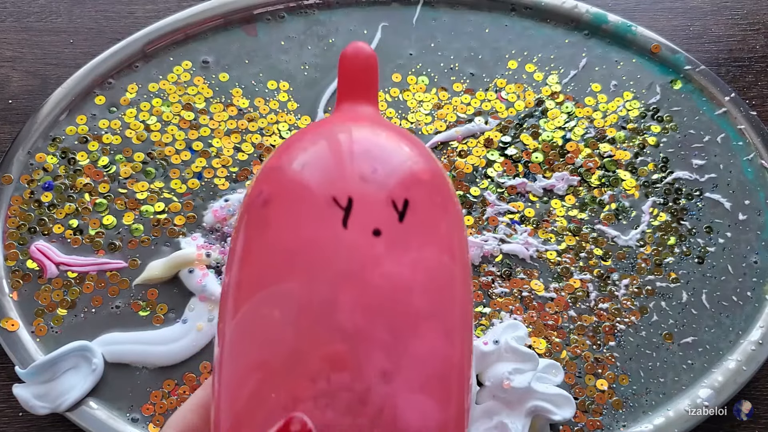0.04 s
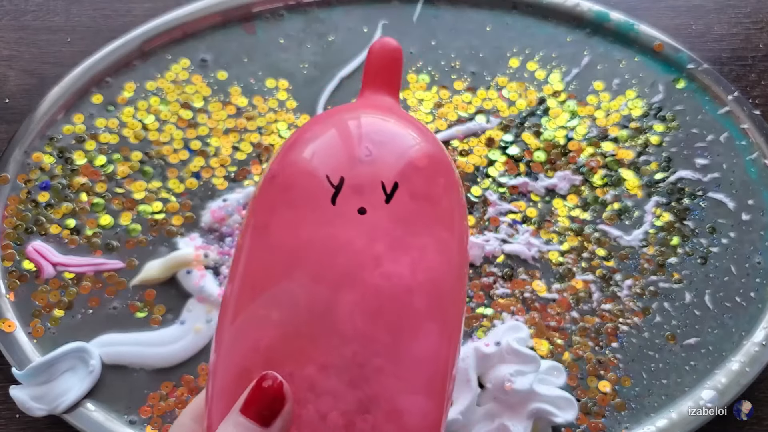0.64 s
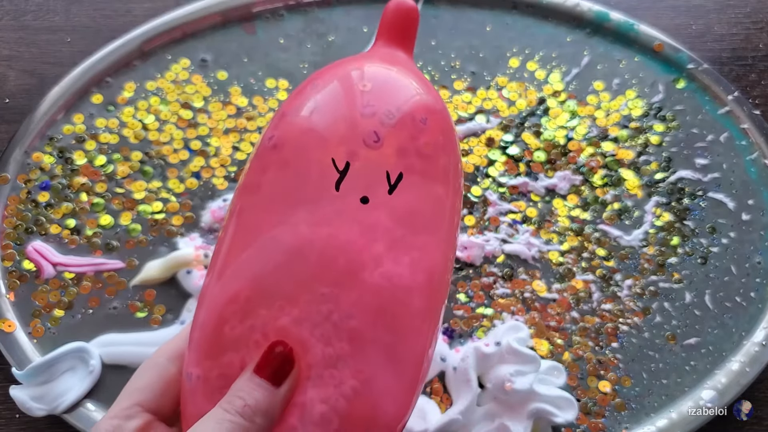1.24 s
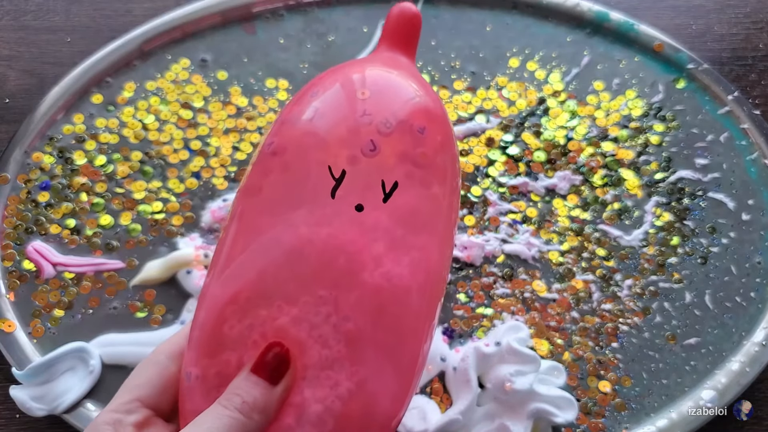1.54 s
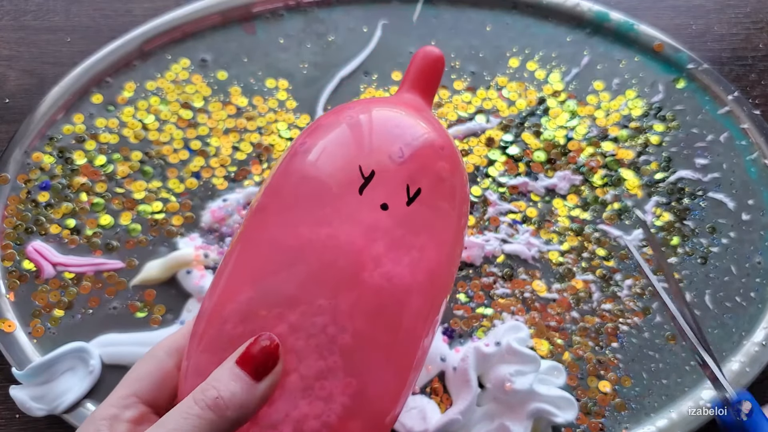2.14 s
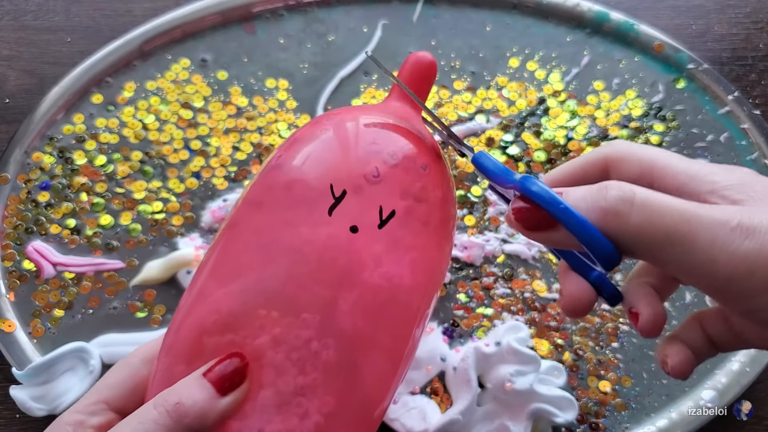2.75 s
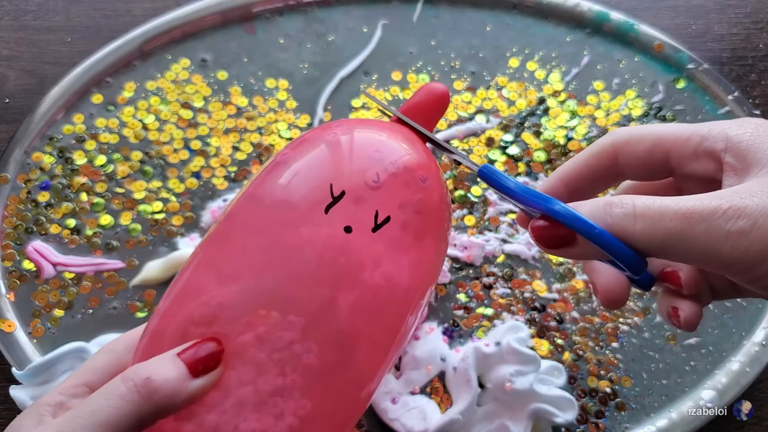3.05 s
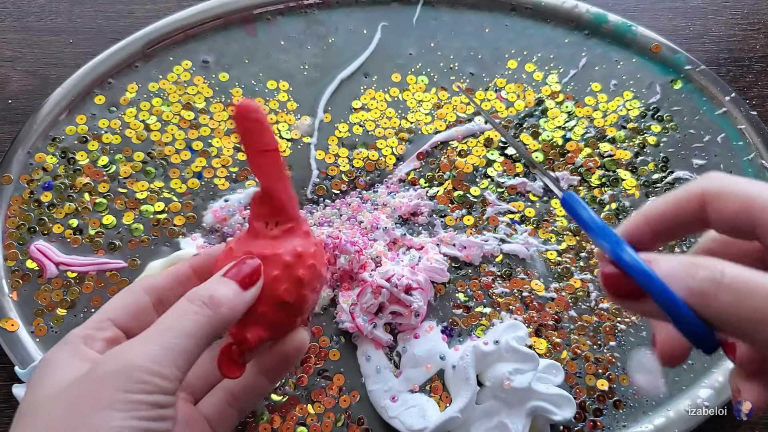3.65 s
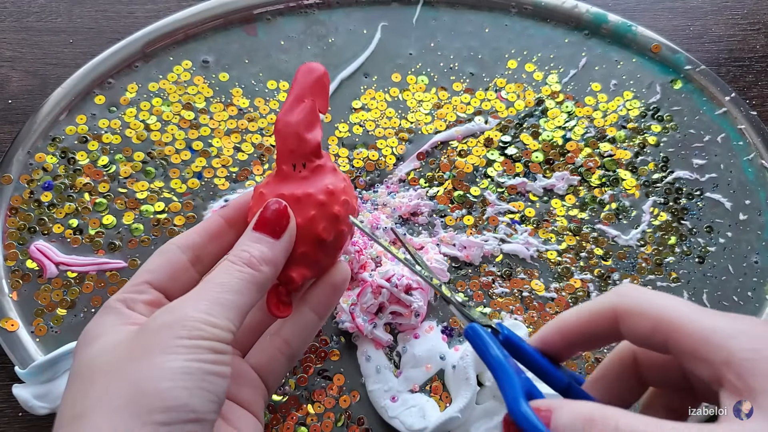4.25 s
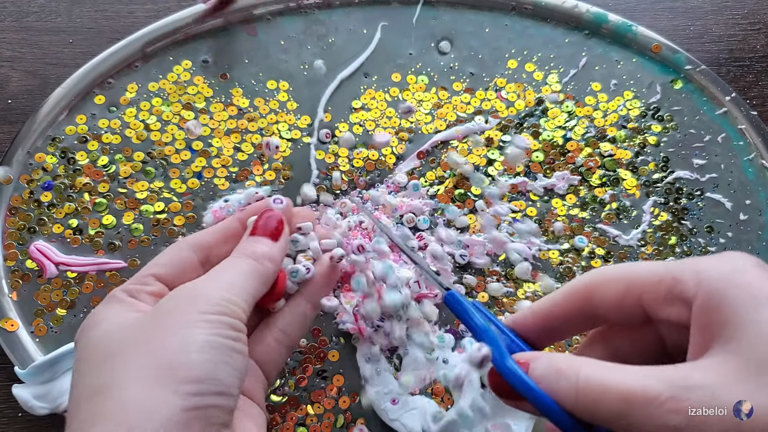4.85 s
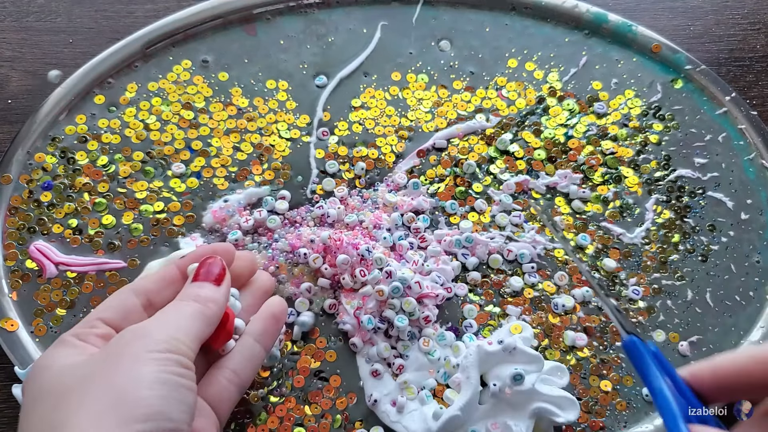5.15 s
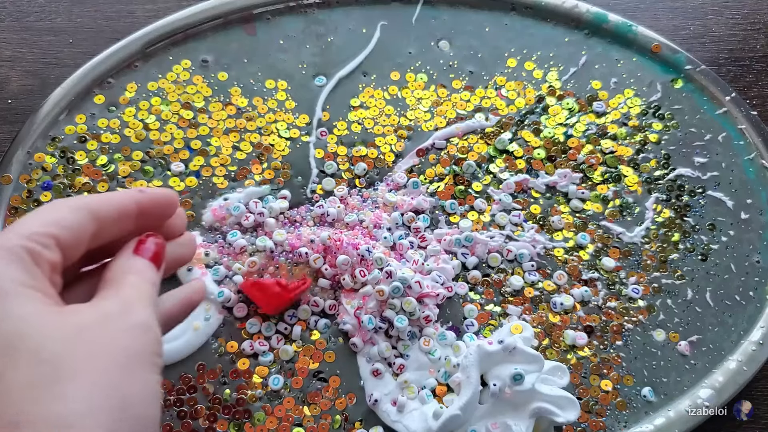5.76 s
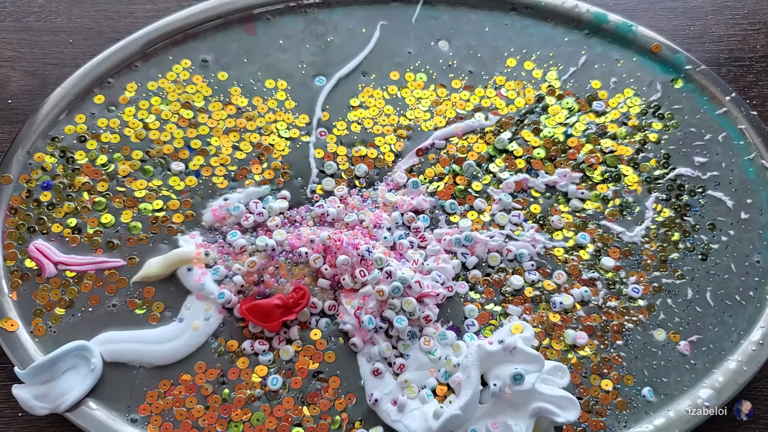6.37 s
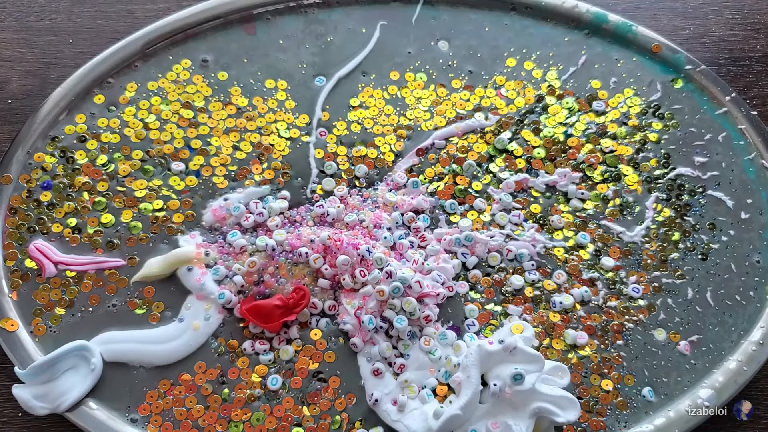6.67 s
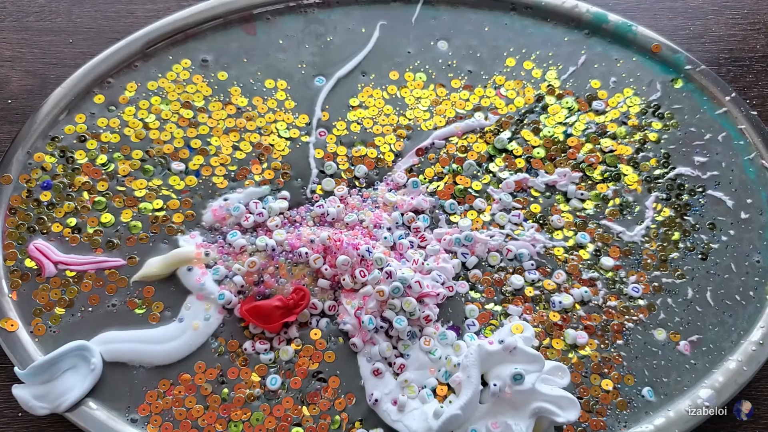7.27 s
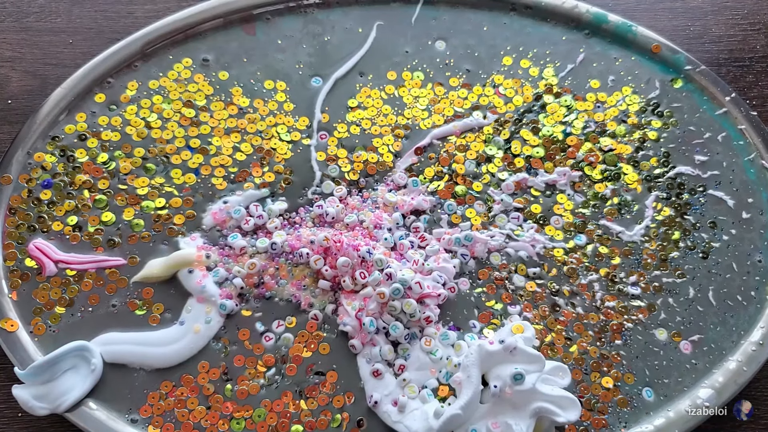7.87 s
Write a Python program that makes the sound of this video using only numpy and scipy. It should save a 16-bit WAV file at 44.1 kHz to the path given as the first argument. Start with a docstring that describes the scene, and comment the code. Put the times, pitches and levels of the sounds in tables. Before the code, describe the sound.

Beads slosh in a rubbed balloon that deflates with a squeak and a burst, followed by clicking beads and soft crunching strokes.

```python
"""Snipping a balloon full of beads

A thin balloon bag of beads is shaken and handled close to a microphone: its skin rustles, groans
and snaps. Once snipped, it squeaks and blows its air out. Beads click onto a tray, and a soft grainy
mass is crunched in strokes until the sound stops short. The loudest hits overload the microphone."""
import sys
import numpy as np
from scipy import signal
from scipy.fft import rfft, irfft, next_fast_len
from scipy.io import wavfile
from scipy.ndimage import uniform_filter1d

SR = 44100
rng = np.random.default_rng(int(sys.argv[2]) if len(sys.argv) > 2 else 0)


def digitize_waveform(pressure):
    """Quantize a signal to 16-bit integers and store it at the path in sys.argv[1].

    Rows of a 2-D input are taken as channels; values are limited to [-1, 1].
    """
    field = np.atleast_2d(pressure).T
    bounded = np.clip(field, -1, 1)
    quanta = np.round(bounded * 32767).astype(np.int16)
    wavfile.write(sys.argv[1], SR, quanta)


N = 357651
TIME = np.arange(N) / SR

# how long the room echoes; a fade (t60) is the time to fall by 60 dB: (frequency [Hz], fade [s])
ROOM_FADES = [(200, 0.42), (3000, 0.26), (15000, 0.073)]
# tone of the background rumble: (frequency [Hz], level [dB])
RUMBLE_TONE = [(20, -31), (45, 1), (80, -5), (140, -12), (250, -19.5), (700, -27.5), (2000, -34),
               (4800, -31.5), (7000, -37.5), (16000, -41)]
# something drags and groans; the last row is a bright swell near 2 kHz within the crunching: (time [s], length
# [s], level [dB], pitch [Hz])
DRAGS = [(.46, 0.26, -34.5, 421), (0.871, 0.08, -49, 1364), (.993, 0.066, -37.5, 1380),
         (.999, .33, -42, 195), (1.145, 0.053, -37, 1760), (1.401, 0.28, -41.5, 175),
         (1.469, .065, -43, 385), (1.59, .21, -42, 1000), (2.464, .25, -52.5, 423), (2.765, 0.18, -47, 415),
         (2.776, 0.29, -51.5, 1300), (3.127, 0.16, -51, 400), (3.253, .15, -37, 2520),
         (7.043, 0.19, -24, 2180)]
# fingers shift their grip on the skin: (time [s], level [dB])
GRIPS = [(.02, -50), (.47, -32), (.66, -51), (1.01, -36), (1.155, -43), (1.22, -38), (1.49, -47),
         (1.61, -48), (1.74, -43), (2.02, -44), (2.81, -42.5), (3.18, -57), (3.3, -43)]
# tone of the rubbed skin: (frequency [Hz], level [dB])
SKIN_TONE = [(150, -9.5), (400, -2.5), (750, -9), (1350, 1.5), (2000, -10), (2700, -1), (3800, -12.5),
             (5000, -15.5), (8000, -27), (16000, -30)]
# clumps of beads bump the wall of the bag: (time [s], level [dB])
BUMPS = [(.408, -36), (0.456, -30), (.475, -21), (.545, -14.5), (.5575, -10.5), (0.567, -10), (0.612, -18),
         (.639, -19), (.678, -23), (0.775, -36.5), (1.586, -30.5), (1.735, -31.5)]
# tone of the sloshing beads: (frequency [Hz], level [dB])
SLOSH_TONE = [(100, -26.5), (230, -13.5), (430, -6.5), (730, -12), (1400, -1.5), (1800, -13), (2400, -3.5),
              (2900, -12), (4100, -17), (6000, -21), (16000, -37.5)]
# single beads tap the tight bag: (time [s], level [dB])
TAPS = [(0.585, 1), (1.845, -32.5), (2.03, -42), (2.068, -29), (2.159, -36), (2.184, -37), (2.278, -43.5),
        (2.413, -47), (3.023, -40), (4.8944, 3.5)]
# the shrinking bag jerks its beads together: (time [s], level [dB], fade [s])
JERKS = [(3.309, -28.5, 0.1), (3.461, -27, 0.1), (3.505, -14, 0.053), (3.555, -15, 0.32),
         (3.578, -0.5, 0.084), (3.596, -7, 0.085), (3.614, -5, 0.051), (3.686, -3.5, 0.044),
         (3.714, -19, 0.3), (3.759, -7.5, 0.12), (3.799, -8, 0.068)]
# tone of the space inside the shrinking bag: (frequency [Hz], level [dB])
CAVITY_TONE = [(200, -11.5), (1000, -7), (2000, -15), (2750, 7), (3600, -7.5), (5100, -4.5), (5700, -18.5),
               (6400, -6), (7800, -17.5), (16000, -24.5)]
# sharp snaps of the tight skin: (time [s], level [dB])
SNAPS = [(1.033, -18.5), (1.2356, -12.5), (1.517, -17)]
# the notes a snap rings at: (pitch [Hz], level [dB], fade [s])
SNAP_NOTES = [(1420, -4.5, 0.25), (3620, -1, 0.28), (4360, -1, 0.15), (6470, -3.5, 0.44),
              (9170, -4.5, 0.29), (12900, -3, 0.31)]
# the slit squeaks in spurts: (time [s], hold [s], level [dB])
SPURTS = [(3.312, .008, -27), (3.353, .025, -24.5), (3.383, .008, -16)]
# air hisses through the slit, then bursts out: (time [s], hold [s], level [dB])
GUSTS = [(3.327, .46, -38), (3.52, .033, -10.5)]
# tone of the rushing air: (frequency [Hz], level [dB])
AIR_TONE = [(150, -11), (900, -0.5), (1900, -6), (2700, 0.5), (6500, -6), (7800, -6), (12000, -8),
            (16000, -11)]
# where the rushing air half whistles: (pitch [Hz])
WHISTLE_PITCHES = [2600, 6560, 8850, 11200, 13800]
# puffs of air hit the microphone: (time [s], level [dB], fade [s])
PUFFS = [(3.515, -18.5, 0.56), (3.786, -15, .16), (7.26, -32, .35)]
# heavy beads knock the tray: (time [s], level [dB])
KNOCKS = [(3.512, -5.5), (3.801, -8), (3.881, -17), (4.8934, -7.5), (5.073, -9), (5.213, -11.5)]
# deep presses on the mass: (time [s], hollow level [dB], thud level [dB], fade [s])
PRESSES = [(3.539, -29, -26, 0.9), (5.05, -42, -27, 0.53), (5.741, -8, -34, 0.16), (5.82, -24, -40, 0.65),
           (6.002, -18.5, -38, 0.082), (6.226, -21, -41, 0.34), (6.41, -16.5, -25, 0.5),
           (6.731, -17, -29.5, 0.32), (6.763, -29, -18, 0.26), (7.222, -37, -33, 0.37)]
# strokes push the mass along: (time [s], length [s], level [dB], fizz level [dB])
STROKES = [(3.594, 0.18, -20.5, -36), (4.037, 0.19, -34, -53), (4.668, .05, -31, -39),
           (5.038, 0.53, -24.5, -35.5), (5.617, 0.5, -25.5, -41), (6.24, 0.089, -27, -51),
           (6.563, 0.092, -27, -46), (6.883, 0.075, -24, -38), (7.002, 0.51, -20.5, -31),
           (7.554, .2, -30.5, -58), (7.872, 0.034, -29, -43)]
# tone of the shifting grains: (frequency [Hz], level [dB])
GRAIN_TONE = [(60, -20.5), (210, 0), (300, -4.5), (550, -3), (900, -2), (1400, 1), (1900, -1), (2900, 4.5),
              (4200, -1), (6500, -5), (9000, -18.5), (14000, -46)]
# tone of their bright fizz and pops: (frequency [Hz], level [dB])
FIZZ_TONE = [(4500, -3), (8000, 7), (12000, 3), (16000, -2.5)]
# pushes set many grains off at once: (time [s], level [dB], fade [s])
CRUNCHES = [(4.504, -22.5, 0.45), (4.843, -18.5, 0.67), (4.897, -19, 0.061), (5.069, -10.5, 0.1),
            (5.084, -13, 0.17), (5.451, -10, 0.033), (5.617, -13, 0.47), (5.738, -9, 0.33),
            (5.837, -16.5, 0.43), (5.883, -14.5, 0.73), (6.002, -14.5, 0.27), (6.145, -19.5, 1),
            (6.226, -14.5, 0.41), (6.491, -14.5, 0.28), (6.517, -16.5, 1), (6.601, -12, 0.21),
            (6.978, -14.5, 0.33), (7.03, -18, 0.39), (7.1, -20.5, 0.71), (7.557, -19.5, 0.68),
            (7.679, -21.5, 0.8)]
# tone of a crunch: (frequency [Hz], level [dB])
CRUNCH_TONE = [(120, -47), (200, -32.5), (299, -17), (500, -10.5), (623, -7), (722, -16), (821, -9.5),
               (1120, -14.5), (2130, -12.5), (3100, -4.5), (4000, -7.5), (5400, -13.5), (10100, -22),
               (16000, -34.5)]
# beads strike the tray: (time [s], level [dB], tick level [dB])
CLICKS = [(3.758, -16, -26), (3.843, -3, -15.5), (3.878, -10, -12), (3.88, 3, -30), (3.976, 0, -14.5),
          (4.028, 2, -13.5), (4.148, -5, -20.5), (4.176, -3.5, -19.5), (4.237, -14.5, -31),
          (4.332, -4.5, -25), (4.376, 0, -16.5), (4.482, -5.5, -25), (4.608, -5, -41), (4.655, 2, -17),
          (4.695, -10, -31), (4.773, -10, -30), (4.843, -14, -28), (4.894, 1.5, -4.5), (5.01, -5, -15.5),
          (5.087, 5, -16), (5.095, -1.5, -14), (5.137, -6, -20), (5.144, -3, -15), (5.213, 1.5, -16),
          (5.282, -10, -24), (5.315, -3.5, -15.5), (5.344, -5, -21), (5.45, 0, -17), (5.461, -3, -25),
          (5.482, -6.5, -19), (5.537, -9.5, -25), (5.599, -5, -27), (6.784, 1.5, -17.5), (6.879, -4, -22)]


def amp(db):
    """Turns decibels into a number to multiply by."""
    return 10 ** (np.asarray(db) / 20)


def evened(x):
    """Scales a sound to an average strength (rms) of 1."""
    return x / np.sqrt(np.mean(x ** 2) + 1e-20)


def read(points, hz):
    """Reads between the rows of a table, giving every octave equal space."""
    f, value = np.transpose(points)
    return np.interp(np.log(hz + 1), np.log(f + 1), value)


def add(mix, s, sound):
    """Mixes a sound in at s seconds."""
    part = mix[round(s * SR):][:len(sound)]
    part += sound[:len(part)]


def colour(x, tone, size=4096):
    """Gives a sound the tone in a table, at strength 1; the filter rings only after each hit."""
    hz = abs(np.fft.fftfreq(size, 1 / SR))
    log_gain = np.log(amp(np.maximum(read(tone, hz), -100)))
    response = np.fft.ifft(np.exp(np.conj(signal.hilbert(log_gain)))).real
    return evened(signal.oaconvolve(x, response[:size // 2])[:len(x)])


def band(hz, width_hz, size):
    """Noise gathered around one pitch."""
    f = np.fft.rfftfreq(size, 1 / SR) + 1
    detune = (f - hz ** 2 / f) / width_hz
    return evened(irfft(rfft(rng.standard_normal(size)) / (1 + detune ** 2), size))


def struck(x, t60, rise_s):
    """Shapes a sound like a hit: it rises fast, then dies away."""
    t = np.arange(len(x)) / SR
    shape = (1 - np.exp(-t / rise_s)) * np.exp(-np.log(1000) * t / t60)
    return evened(x * shape) * np.sqrt(np.mean(shape ** 2))


def blows(rows, hz, width_hz, size=32768):
    """Hits that ring around one pitch: (time [s], level [dB], fade [s])."""
    out = np.zeros(N)
    for s, db, t60 in rows:
        add(out, s, amp(db) * struck(band(hz, width_hz, size), t60, rise_s=0.028 * t60))
    return out


def grains(per_s, spread_db, t60=0.0052, shapes=20, size=400):
    """Tiny collisions of many shapes; spread_db makes a few stand out."""
    out = np.zeros(N)
    for _ in range(shapes):
        strengths = amp(spread_db * np.minimum(rng.exponential(1, N), 4))
        hits = rng.random(N) < per_s / shapes / SR
        grain = struck(rng.standard_normal(size), t60, 1 / SR)
        out += signal.oaconvolve(strengths * hits, grain)[:N]
    return evened(out)


def surges(rows, rise_s):
    """Loudness curve of pushes that each die away: (time [s], level [dB], fade [s])."""
    power, t = np.zeros(N), np.arange(SR // 2) / SR
    for s, db, t60 in rows:
        push = amp(db) * (1 - np.exp(-t / rise_s)) * np.exp(-np.log(1000) * t / t60)
        add(power, s, push ** 2)
    return np.sqrt(power)


def swell(s, db, rise_db_s, fall_db_s, hold=0, sag_db_s=0):
    """Loudness curve that reaches db at s seconds, holds or sags, then falls; slopes in dB a second."""
    before, after = np.maximum(s - TIME, 0), np.maximum(TIME - s, 0)
    drop = rise_db_s * before + sag_db_s * after + fall_db_s * np.maximum(after - hold, 0)
    return amp(db - np.minimum(drop, 150))


def rumble(db=-51):
    """A faint, steady, low noise behind everything."""
    return amp(db) * colour(rng.standard_normal(N), RUMBLE_TONE)


def room(x, build_s=0.015, size=256):
    """The blurred echo of a small room; its high notes die first."""
    hz, t, spectrum = signal.stft(rng.standard_normal(SR // 2), SR, nperseg=size)
    spectrum *= np.exp(-np.log(1000) * t / read(ROOM_FADES, hz)[:, None])
    spectrum *= amp(read([(700, 3), (3000, 1.5), (7000, -4.5), (15000, 6.0)], hz))[:, None]
    tail = signal.istft(spectrum, SR, nperseg=size)[1]
    tail *= np.minimum(np.arange(len(tail)) / SR / build_s, 1)
    return signal.oaconvolve(x, tail / np.linalg.norm(tail))[:len(x)]


def groans(width_share=.13, least_width_hz=55):
    """Each row swells and fades around one pitch."""
    out = np.zeros(N)
    for s, length, db, hz in DRAGS:
        size = round(length * SR)
        arch = np.sin(np.linspace(0, np.pi, size))
        add(out, s, amp(db) * band(hz, width_share * hz + least_width_hz, size) * arch)
    return out


def puffs():
    """Air hits the microphone with a low thump."""
    return blows(PUFFS, hz=66, width_hz=45)


def bag():
    """Fingers rub the skin; beads slosh, tap the wall and rattle brightly as the bag shrinks."""
    grip = sum(swell(s, db, rise_db_s=700, fall_db_s=105) for s, db in GRIPS)
    shake = swell(s=0.54, db=-26, rise_db_s=201, fall_db_s=103)
    bumps = surges([(s, db, 0.087) for s, db in BUMPS], rise_s=0.00087)
    rub = colour(grains(per_s=1500, spread_db=0), SKIN_TONE) * grip
    slosh = colour(grains(per_s=2200, spread_db=2.5), SLOSH_TONE) * np.hypot(shake, bumps)
    taps = blows([(s, db, .02) for s, db in TAPS], hz=2480, width_hz=580)
    rattle = colour(grains(per_s=6000, spread_db=2), CAVITY_TONE) * surges(JERKS, rise_s=0.00049)
    return rub + slosh + taps + rattle


def snaps(ring_db=-21, echo_db=-12, size=16384):
    """The tight skin cracks, then the bag and the room ring fuzzily."""
    out = np.zeros(N)
    for s, db in SNAPS:
        for hz, note_db, t60 in SNAP_NOTES:
            crack = struck(band(hz, 1100, size), t60=0.022, rise_s=.0001)
            ring = struck(band(hz, 750, size), t60, rise_s=0.00096)
            snap = crack + amp(ring_db) * ring + amp(echo_db) * room(crack)
            add(out, s, amp(db + note_db - 5) * snap)
    return out


def squeak(start_hz=1400, end_hz=1200, sag_at_s=3.338, glide_s=0.01, overtone_db=-14):
    """The lips of the slit flutter; the pitch sags as the slit widens."""
    tight = .5 - .5 * np.tanh((TIME - sag_at_s) / (2 * glide_s))
    hz = end_hz + (start_hz - end_hz) * tight
    waver = .02 * evened(uniform_filter1d(rng.standard_normal(N), size=90))
    phase = 2 * np.pi * np.cumsum(hz * (1 + waver)) / SR
    rasp = .3 * (.3 + 2 * tight) * band(1300, 420, N)
    spurts = sum(swell(s, db, rise_db_s=1499, fall_db_s=1298, hold=hold) for s, hold, db in SPURTS)
    return evened(np.sin(phase) + amp(overtone_db) * np.sin(2 * phase) + rasp) * spurts


def escaping_air(whistle_db=-10, whistle_top_db=-40):
    """Air rushes out of the slit, hissing and half whistling."""
    flow = sum(swell(s, db, rise_db_s=403, fall_db_s=297, hold=hold) for s, hold, db in GUSTS)
    whistles = sum(band(hz, 950, next_fast_len(N))[:N] for hz in WHISTLE_PITCHES)
    whistling = np.minimum(amp(whistle_db) * flow, amp(whistle_top_db))  # a strong gust is mostly hiss
    return colour(rng.standard_normal(N), AIR_TONE) * flow + whistles * whistling


def tray():
    """Beads knock the tray; deep presses sound hollow in the mass and thud below it."""
    knocks = blows([(s, db, 0.069) for s, db in KNOCKS], hz=1240, width_hz=760)
    hollow = blows([(s, db, t60) for s, db, _, t60 in PRESSES], hz=608, width_hz=220)
    thuds = blows([(s, db, t60) for s, _, db, t60 in PRESSES], hz=195, width_hz=130)
    return knocks + hollow + thuds


def grainy_mass(settle_db=-25, settle_fizz_db=-19, settle_t60=0.41):
    """Grains settle after each bead lands, shift with each stroke, and crunch and pop when pushed."""
    shift = surges([(s, db + settle_db, settle_t60) for s, db, _ in CLICKS], rise_s=.003)
    sparkle = surges([(s, db + settle_fizz_db, settle_t60) for s, _, db in CLICKS], rise_s=.003)
    for s, length, db, fizz_db in STROKES:
        stroke = swell(s, 0, rise_db_s=296.5, fall_db_s=124, hold=length, sag_db_s=4)
        shift = np.hypot(shift, amp(db) * stroke)
        sparkle = np.hypot(sparkle, amp(fizz_db) * stroke)
    crackle = colour(grains(per_s=3500, spread_db=3.4, t60=0.0038), GRAIN_TONE) * shift
    fizz = colour(grains(per_s=2900, spread_db=5.5, t60=0.003), FIZZ_TONE) * sparkle
    crunch = colour(grains(per_s=4400, spread_db=2), CRUNCH_TONE)
    pops = amp(-22) * colour(grains(per_s=350, spread_db=5, t60=.008), FIZZ_TONE)
    return crackle + fizz + (crunch + pops) * surges(CRUNCHES, rise_s=0.00064)


def bead_clicks(bead_hz=2865, knock_db=-11, echo_db=-13, lag_s=.0009, size=12288):
    """A bright tick of contact, then the short ring of the bead, a knock of the tray and the echo."""
    out = np.zeros(N)
    for s, db, tick_db in CLICKS:
        click = amp(tick_db + 7) * struck(band(11000, 13000, size), t60=0.0063, rise_s=.0001)
        hz = bead_hz * np.exp(.06 * rng.standard_normal())  # each bead has its own pitch
        ring = struck(band(hz, 3200, size), t60=0.019, rise_s=0.00057)
        knock = struck(band(1100, 2000, size), t60=0.045, rise_s=.0006)
        add(click, lag_s, amp(db - 4) * (ring + amp(knock_db) * knock))
        add(out, s + .0004, click + amp(echo_db) * room(click))
    return out


def scene(stop_s=7.915, echo_db=-16):
    """All the handling in its room stops short, leaving the low rumble."""
    rustle = bag() + groans() + snaps() + squeak() + escaping_air() + grainy_mass()
    handling = bead_clicks() + tray() + puffs() + rustle + amp(echo_db) * room(rustle)
    return (handling * (TIME < stop_s) + rumble())[None]


def record(dry, low_hz=28, top_hz=16000):
    """The microphone drops the deepest rumble, squashes the loudest peaks and cuts the highest hiss."""
    heard = signal.sosfilt(signal.butter(2, low_hz, "highpass", fs=SR, output="sos"), dry)
    clipped = heard / (1 + heard ** 8) ** (1 / 8)
    treble_cut = signal.firwin(401, top_hz, window=("kaiser", 8), fs=SR)
    return signal.oaconvolve(clipped, treble_cut[None], "same")


dry = scene()
out = record(dry)
digitize_waveform(out)
```